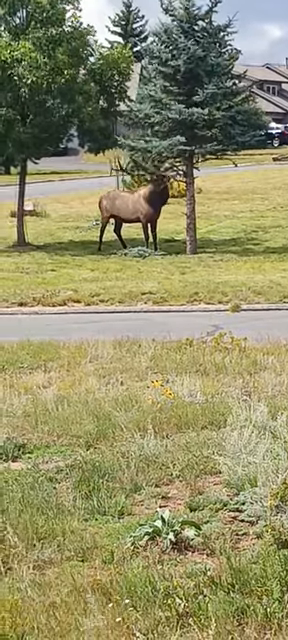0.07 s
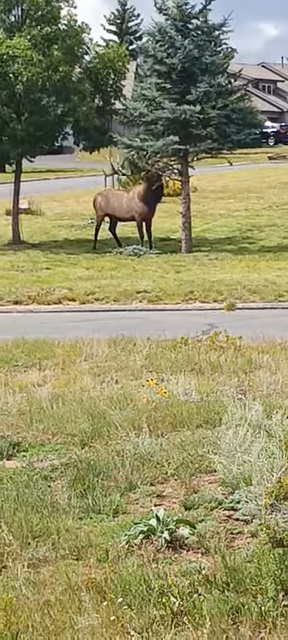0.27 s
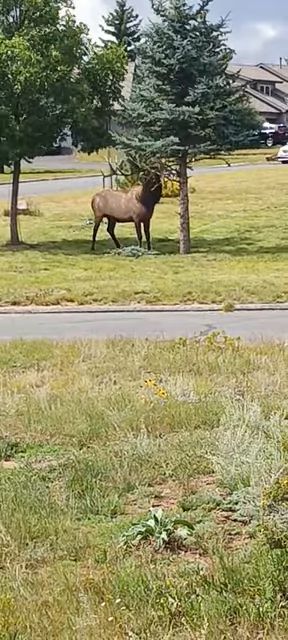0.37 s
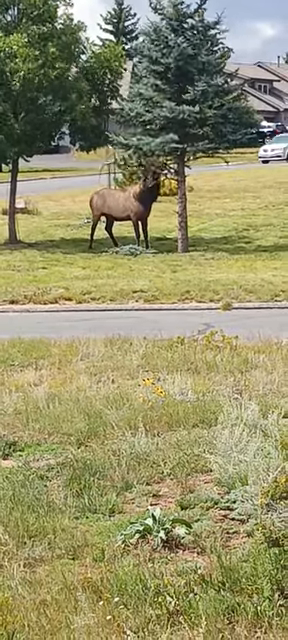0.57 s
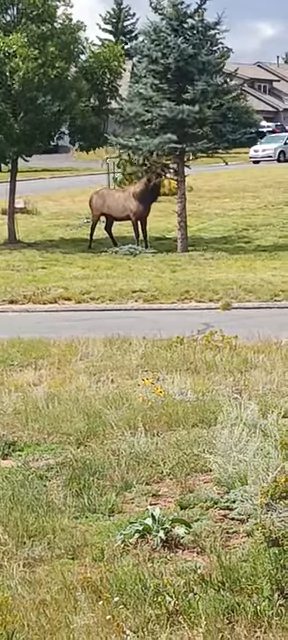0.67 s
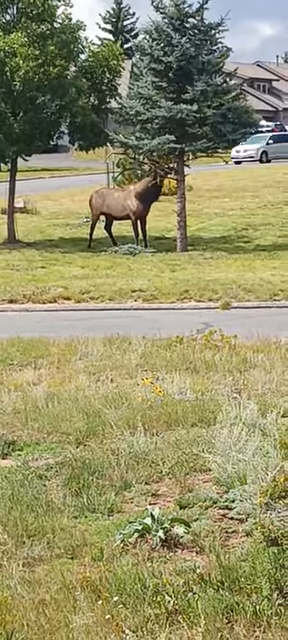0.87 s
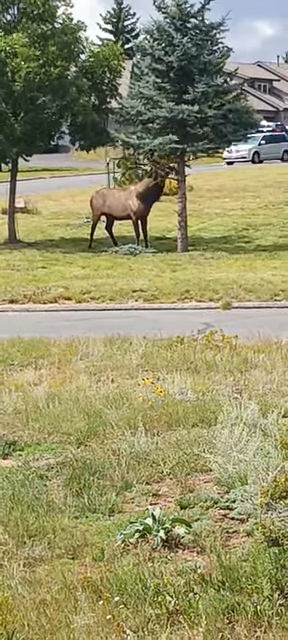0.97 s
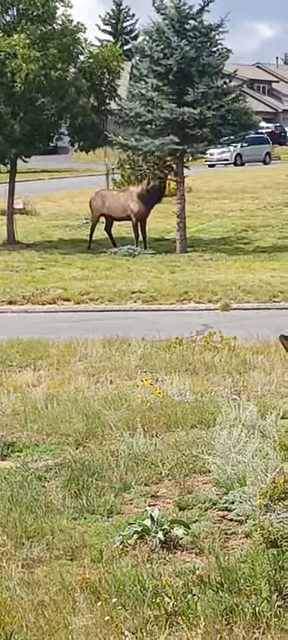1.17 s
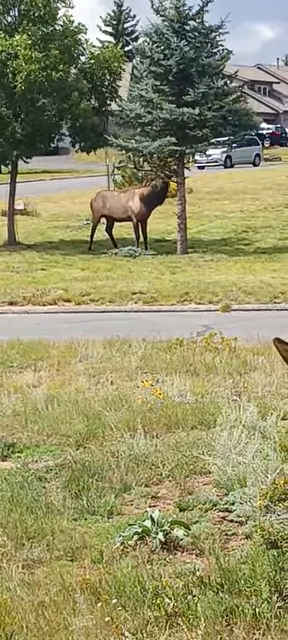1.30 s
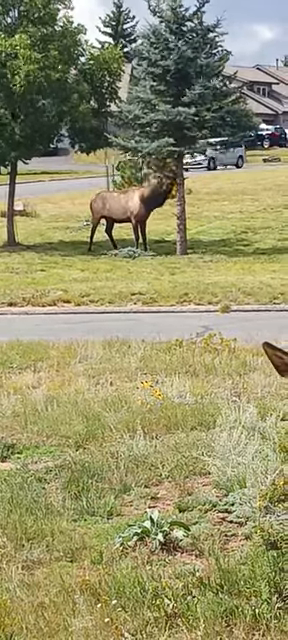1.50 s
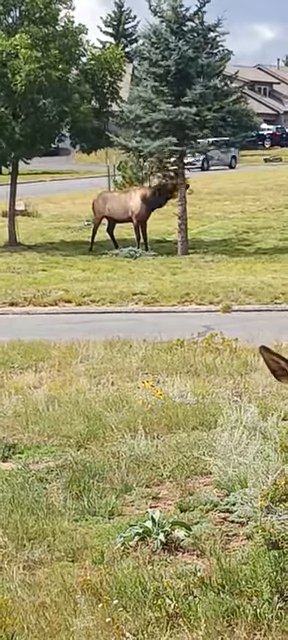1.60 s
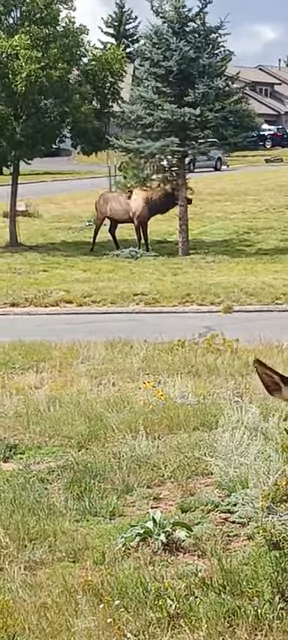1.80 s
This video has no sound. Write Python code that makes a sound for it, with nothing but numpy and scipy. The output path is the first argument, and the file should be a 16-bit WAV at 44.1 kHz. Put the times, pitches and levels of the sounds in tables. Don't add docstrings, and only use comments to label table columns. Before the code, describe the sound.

Songbirds beside a road, leaning left: overlapping long whistles first, a sharp buzzing trill next, then scattered fast chatter fading out, with light echoes from houses and trees, distant low traffic and soft microphone hiss.

```python
import sys
import numpy as np
from scipy import signal
from scipy.io import wavfile
from scipy.ndimage import uniform_filter1d

SR = 44100
rng = np.random.default_rng(int(sys.argv[2]) if len(sys.argv) > 2 else 0)


def wav_out(sig):
    wavfile.write(sys.argv[1], SR, np.round(np.clip(np.atleast_2d(sig).T, -1, 1) * 32767).astype(np.int16))


def gain_from_db(level_db):
    decades = np.asarray(level_db, float) / 20
    return 10 ** decades


N = 81585

# time_s, pitch_hz, level_db
HIGH_RISE = [(.01, 8800, -75), (.045, 8860, -64.5), (.075, 8700, -58.5), (.115, 8200, -53.5),
             (.16, 7790, -57.5), (.198, 8000, -65)]
HIGH_LONG = [(.195, 7800, -66), (.222, 8870, -56.5), (.25, 8920, -48.5), (.29, 8820, -45),
             (.328, 8630, -41.5), (.365, 8620, -43.5), (.432, 8420, -43.5), (.578, 8304, -41.5),
             (.588, 8430, -62)]
HIGH_UNDER = [(.2, 7770, -53.5), (.25, 7650, -63), (.3, 7650, -53.5), (.35, 7600, -59), (.39, 7350, -62),
              (.42, 7540, -79.5)]
HIGH_LATE = [(1.462, 6600, -61), (1.471, 7260, -59.5), (1.485, 8270, -53.5), (1.511, 8400, -53),
             (1.56, 7320, -51.5), (1.575, 7210, -49), (1.583, 6930, -56), (1.591, 5700, -52)]
# middle_s, length_s, dip_db
BREAKS = [
    (0.309, .02, -6.5),
    (.338, 0.015, -20),
    (0.377, 0.016, -9.5),
    (0.412, .01, -1),
    (0.45, 0.022, -40),
    (0.495, 0.018, -23),
    (0.548, 0.01, -29),
]
UPPER_DB, LOWER_DB = -22, -23


def high_whistler():
    song = np.zeros(N)
    add(song, *whistle(HIGH_LONG, upper_db=UPPER_DB, lower_db=LOWER_DB))
    t = np.arange(N) / SR
    for middle, length, dip_db in BREAKS:
        flat_bell = np.exp(-(((t - middle) / (length / 2)) ** 2) ** 2)
        song *= gain_from_db(dip_db * flat_bell)
    add(song, *whistle(HIGH_RISE, upper_db=UPPER_DB, warble_hz=70))
    add(song, *whistle(HIGH_UNDER, octave_db=-15))
    add(song, *whistle(HIGH_LATE, upper_db=UPPER_DB))
    return song


# time_s, pitch_hz, level_db
LOW_OPENING = [(0, 2550, -58.5), (.02, 2070, -58), (.035, 1868, -51), (.05, 1793, -60), (.17, 1774, -81),
               (.3, 1810, -64.5), (.45, 1777, -74)]
LOW_LONG = [(0.201, 2880, -67), (.226, 2730, -59.5), (0.274, 2586, -50.5), (0.332, 2711, -46),
            (.362, 2727, -45), (0.409, 2140, -48.5), (0.445, 2022, -49), (0.488, 2016, -50),
            (0.573, 2032, -58.5), (.6, 2010, -69)]
LOW_SHORT = [(0.194, 3140, -79), (0.216, 3167, -53.5), (0.243, 3141, -46), (0.259, 3080, -63)]
# time_s, pitch_hz, level_db
OVERTONES = [
    [(.3, 5390, -81), (.33, 5400, -67), (.36, 5380, -70), (.42, 5390, -71), (.46, 5380, -73)],
    [(.22, 6500, -67), (.37, 6800, -76)],
]


def low_whistler():
    song = np.zeros(N)
    for curve in [LOW_OPENING, LOW_LONG, LOW_SHORT] + OVERTONES:
        add(song, *whistle(curve))
    return song


# time_s, pitch_hz, level_db
FAR_WARBLE = [(.7, 3600, -61), (.73, 3216, -56), (.75, 2700, -48.5), (.77, 2338, -58), (.795, 2164, -55)]
FAR_PHRASE = [(.91, 2540, -62), (.915, 2860, -54), (.923, 2164, -56.5), (.958, 2300, -70),
              (.968, 2790, -57.5), (.985, 2050, -64.5), (1.04, 2252, -69), (1.1, 2326, -65),
              (1.152, 2540, -67)]
FAR_CLOSE = [(1.245, 2423, -65), (1.301, 2144, -71)]


def far_singer():
    song = np.zeros(N)
    add(song, *whistle(FAR_WARBLE, warble_hz=430))
    add(song, *whistle(FAR_PHRASE))
    add(song, *whistle(FAR_CLOSE))
    return song


# start_s, length_s, level_db, first_hz, last_hz
TRILL = [
    (0.730, 0.014, -31, 3870, 3620),
    (.789, 0.019, -41.5, 4190, 4310),
    (.829, 0.012, -28.5, 3578, 3705),
    (.932, 0.017, -31.5, 3760, 3490),
    (1.041, 0.011, -31, 3864, 3444),
    (1.155, 0.016, -34.5, 3720, 3500),
]
# start_s, length_s, level_db, first_hz, last_hz
CHATTER = [
    (1.319, 0.0088, -39, 3990, 3280),
    (1.366, 0.0063, -46.5, 2700, 2070),
    (1.435, 0.018, -40.5, 3000, 2610),
    (1.530, 0.011, -46, 2800, 5970),
    (1.58, 0.013, -41.5, 2880, 2440),
    (1.753, 0.0125, -52, 2770, 5370),
    (1.836, 0.0069, -49.5, 3970, 5150),
    (1.845, .006, -47, 3470, 3050),
]
# start_s, length_s, level_db, first_hz, last_hz
HOOKS = [
    (1.330, 0.018, -50, 2920, 2214),
    (1.410, 0.0099, -47, 6440, 4880),
    (1.537, 0.0094, -32, 4230, 3620),
]
# time_s, pitch_hz, level_db
TWISTS = [
    [(.646, 4530, -43.5), (.653, 4414, -35.5), (.657, 4360, -36), (.6605, 4190, -41.5), (.663, 4450, -48),
     (.668, 4500, -42)],
    [(.777, 3470, -35), (.78, 3624, -32), (.786, 3682, -39), (.79, 3786, -32), (.793, 3620, -42)],
    [(1.3915, 3320, -40), (1.395, 3946, -35), (1.401, 3887, -34.5), (1.4045, 3380, -38.5),
     (1.407, 3600, -34.5), (1.409, 4130, -45), (1.412, 4500, -38)],
    [(1.4705, 4040, -39), (1.473, 4880, -36.5), (1.4755, 4280, -35), (1.478, 3834, -31), (1.483, 4010, -41),
     (1.487, 4070, -32)],
    [(1.544, 3920, -35), (1.547, 3110, -39), (1.553, 2763, -39), (1.562, 3060, -52), (1.572, 3050, -67)],
    [(1.6135, 3650, -28), (1.616, 3875, -43), (1.62, 3920, -36.5), (1.6225, 4460, -41.5),
     (1.6255, 3610, -36.5), (1.628, 3650, -49), (1.632, 4440, -48), (1.636, 4950, -48)],
    [(1.677, 4380, -35), (1.679, 4733, -42.5), (1.684, 4760, -45), (1.686, 4000, -41), (1.688, 3480, -44.5),
     (1.691, 4000, -55), (1.694, 3450, -51), (1.698, 2740, -54)],
    [(1.726, 3020, -46), (1.7285, 2650, -46.5), (1.732, 2760, -50.5), (1.7355, 3050, -52),
     (1.738, 2530, -57.5)],
]
TRILL_BEND, CHATTER_BEND, HOOK_BEND = 1.165, 0.76, 4.13


def close_singer():
    song = np.zeros(N)
    for notes, bend in ((TRILL, TRILL_BEND), (CHATTER, CHATTER_BEND), (HOOKS, HOOK_BEND)):
        for note in notes:
            add(song, *chirp(*note, bend, flutter_hz=50))
    for curve in TWISTS:
        add(song, *whistle(curve, edge_s=0.00133, size=50))
    return voice_box(song, splash_db=-33)


# start_s, length_s, level_db, first_hz, last_hz
BUZZ = [(.669, 0.05, -37, 4383, 4240), (.667, 0.055, -37.5, 4016, 3703), (.881, 0.011, -33, 3550, 3990),
        (.885, 0.028, -38.5, 4450, 4390), (.986, 0.012, -32, 3600, 4200), (.989, 0.034, -39.5, 4404, 4600),
        (1.095, 0.0146, -32.5, 3705, 4160), (1.099, 0.027, -37, 4500, 4374),
        (1.212, 0.015, -36, 3782, 4190), (1.216, 0.023, -40.5, 4373, 4490),
        (1.222, 0.031, -44.5, 3877, 4030)]


def buzzing_notes():
    song = np.zeros(N)
    for note in BUZZ:
        add(song, *chirp(*note, TRILL_BEND, flutter_hz=85))
    return voice_box(song, splash_db=-23)


def voice_box(x, splash_db):
    z = signal.hilbert(x)
    power = abs(z) ** 2
    beating = power / (uniform_filter1d(power, size=150) + 1e-9) - 1
    mixed = (z * beating).real
    air = abs(z) * uniform_filter1d(rng.standard_normal(N), size=3)
    return x + gain_from_db(-15) * mixed + gain_from_db(splash_db) * air


WARBLE_RATE_HZ, WARBLE_TOP_S, SIDE_HZ = 72, .739, 3900
FUZZ_SHARE = .006


def whistle(curve, octave_db=-99, upper_db=-99, lower_db=-99, warble_hz=0, edge_s=0.0067, size=120):
    s, hz, db = np.transpose(curve)
    t = np.arange(s[0], s[-1], 1 / SR)
    pitch = uniform_filter1d(np.interp(t, s, hz), size=size, mode="nearest")
    pitch = pitch * (1 + FUZZ_SHARE * wander(len(t), size=60))
    pitch += warble_hz * np.cos(2 * np.pi * WARBLE_RATE_HZ * (t - WARBLE_TOP_S))
    phase = 2 * np.pi * np.cumsum(pitch) / SR
    side_shift = 2 * np.pi * SIDE_HZ * t
    tone = np.sin(phase) + gain_from_db(octave_db) * np.sin(2 * phase)
    tone += gain_from_db(upper_db) * np.sin(phase + side_shift) + gain_from_db(lower_db) * np.sin(phase - side_shift)
    edge = 1
    if s[0] > 0:
        edge = np.clip(np.minimum(t - s[0], s[-1] - t) / edge_s, 0, 1)
    level = gain_from_db(np.interp(t, s, db) + .9 * wander(len(t), size=400))
    return s[0], np.sqrt(2) * edge * level * tone


RISE_S, FALL_S, FADE_DB = 0.0025, 0.0036, -4.5
FLUTTER_DB, THIRD_DB = 1.2, -42


def chirp(start, length, db, first_hz, last_hz, bend, flutter_hz):
    pitch_shake, level_shake = wander(4096, size=50), wander(4096, size=60)
    t = np.arange(0, min(length, .09), 1 / SR)
    u = t / length
    hz = last_hz + (first_hz - last_hz) * (1 - u) ** bend + flutter_hz * pitch_shake[:len(t)]
    phase = 2 * np.pi * np.cumsum(hz) / SR
    ramp = np.clip(np.minimum(t / RISE_S, (length - t) / FALL_S), 0, 1)
    edge = np.sin(np.pi / 2 * ramp) ** 2
    level = gain_from_db(db + 1.5 + FADE_DB * u + FLUTTER_DB * level_shake[:len(t)])
    return start, edge * level * (np.sin(phase) + gain_from_db(THIRD_DB) * np.sin(3 * phase))


# pitch_hz, t60_s
RING = [(1500, 1.9), (3000, 0.51), (5000, 0.71), (9000, 0.36)]
# delay_s, level_db
ECHOES = [
    (0.009, -11),
    (.021, -17.5),
    (0.04, -21),
]


def lawn(x, wet_db, lean_db):
    taps = np.zeros((2, SR))
    at = np.arange(400, SR - 20, 20)
    at = at + rng.integers(0, 20, (2, len(at)))
    np.put_along_axis(taps, at, rng.choice([-1., 1.], at.shape), 1)
    taps[1] = 0.53 * taps[0] + 1.38 * taps[1]
    hz, t, z = signal.stft(taps, SR, nperseg=256)
    decay = gain_from_db(-60 * t / read(RING, hz)[:, None])
    tail = signal.istft(z * decay, SR, nperseg=256)[1]
    tail *= gain_from_db(wet_db) / np.linalg.norm(tail[0])
    for s, db in ECHOES:
        tail[:, round(s * SR)] += gain_from_db(db + wet_db + 9.5)
    wet = signal.fftconvolve(x[None], tail, axes=1)[:, :N]
    direct = x * gain_from_db(np.array([[lean_db], [-lean_db]]) / 2)
    return direct + wet * gain_from_db(np.array([[1.5], [-1.5]]))


# pitch_hz, level_db (per Hz)
RUMBLE = [(12, -47), (20, -20.5), (75, 1.5), (113, -3.5), (275, -8.5), (439, -14), (586, -22), (797, -28.5),
          (1500, -21.5), (1950, -23.5), (3300, -120)]


def traffic():
    rumble = noise(RUMBLE + [(2500, -39)], -55, patchy_db=0.06)
    return rumble * gain_from_db(np.array([[-.4], [.4]]))


# pitch_hz, level_db
HISS = [(300, -14), (1300, 6), (2000, 4.5), (3200, -1), (5500, -5), (9500, -11), (12500, -10), (16000, -14)]


def hiss():
    return noise(HISS, -63, patchy_db=1.5) * gain_from_db(np.array([[1.2], [-1.2]]))


# pitch_hz, likeness (0 to 1)
LIKENESS = [(30, 0.32), (80, 0.76), (150, 0.29), (300, 0.16), (1000, 0.16), (5000, 0.59), (9000, 0.92),
            (15000, 0.2)]


def noise(shape, db, patchy_db):
    frames, hz = N // 256 + 5, np.fft.rfftfreq(1024, 1 / SR)
    a, b, c, d, patches = rng.standard_normal((frames, 513, 5)).T
    patches = uniform_filter1d(uniform_filter1d(patches, size=8, axis=0), size=12, axis=1)
    same = np.clip(read(LIKENESS, hz), -1, 1)[:, None]
    left = a + 1j * b
    right = same * left + np.sqrt(1 - same ** 2) * (c + 1j * d)
    z = np.array([left, right]) * gain_from_db(read(shape, hz)[:, None] + patchy_db * evened(patches))
    return gain_from_db(db) * evened(signal.istft(z, nperseg=1024, noverlap=768)[1][:, :N])


def wander(count, size):
    return evened(uniform_filter1d(uniform_filter1d(rng.standard_normal(count), size), size))


def evened(x):
    return x / np.sqrt(np.mean(x ** 2) + 1e-20)


def read(points, hz):
    f, value = np.transpose(points)
    return np.interp(np.log(hz + 1), np.log(f + 1), value)


def add(mix, s, sound):
    part = mix[max(round(s * SR), 0):][:len(sound)]
    part += sound[:len(part)]


def scene():
    birds = lawn(high_whistler(), wet_db=-9.5, lean_db=8.0)
    birds += lawn(low_whistler(), wet_db=-8.5, lean_db=10.0)
    birds += lawn(far_singer(), wet_db=-2.5, lean_db=10.0)
    birds += lawn(close_singer() + buzzing_notes(), wet_db=-9.5, lean_db=7.0)
    return birds + traffic() + hiss()


def roll_off(x):
    return signal.sosfilt(signal.butter(12, 15730, fs=SR, output="sos"), x)


def record(dry):
    band_limit = signal.firwin(401, 15600, window=("kaiser", 9), fs=SR)
    limited = signal.oaconvolve(dry, band_limit[None], "same")
    return roll_off(limited)


dry = scene()
out = record(dry)
wav_out(out)
```